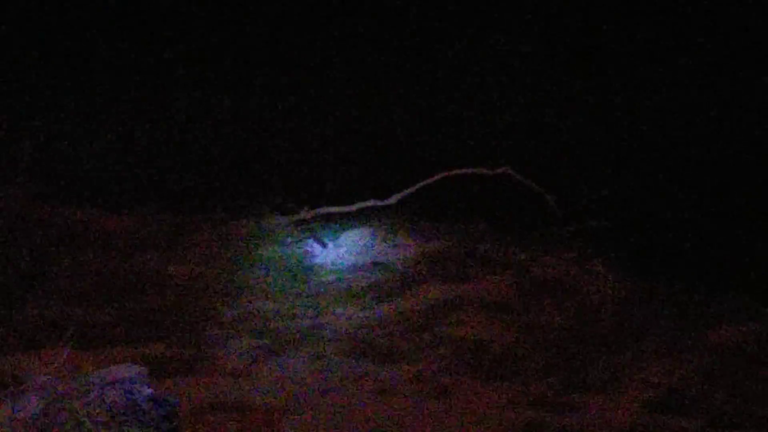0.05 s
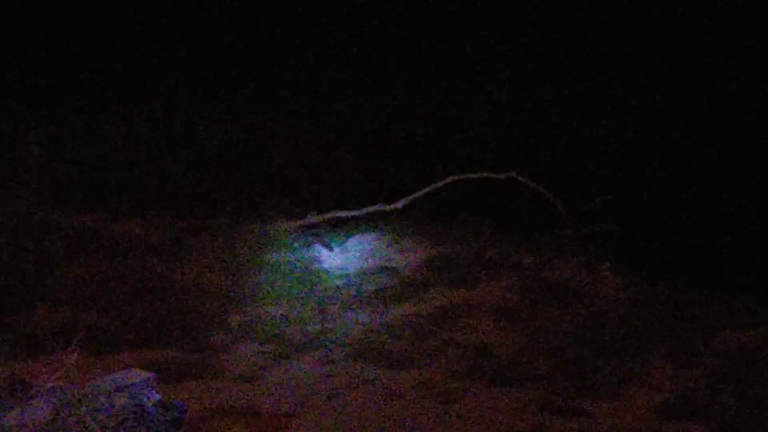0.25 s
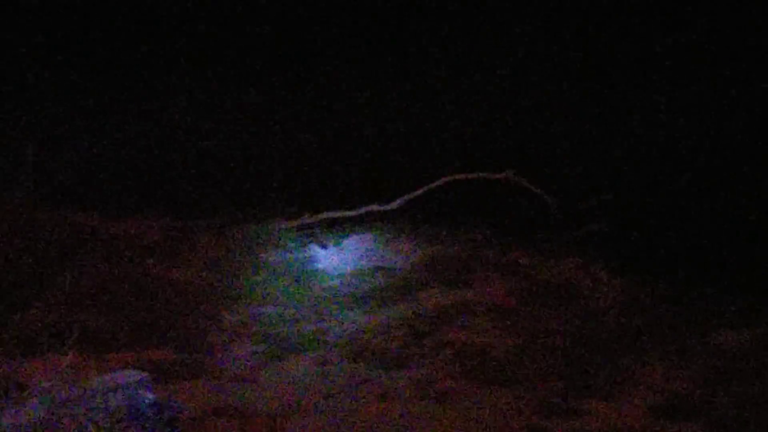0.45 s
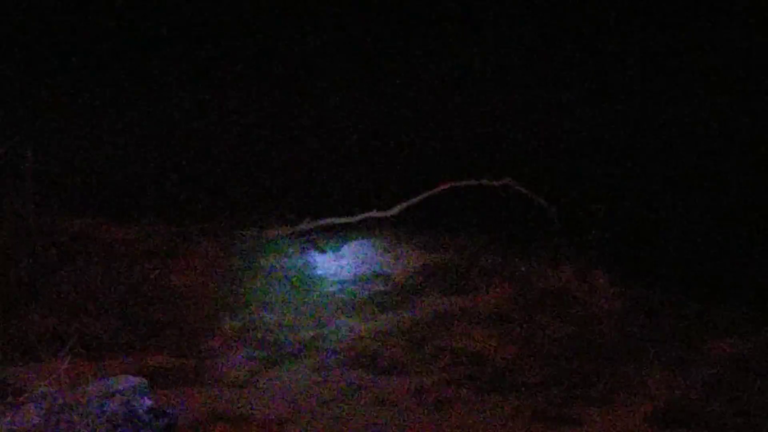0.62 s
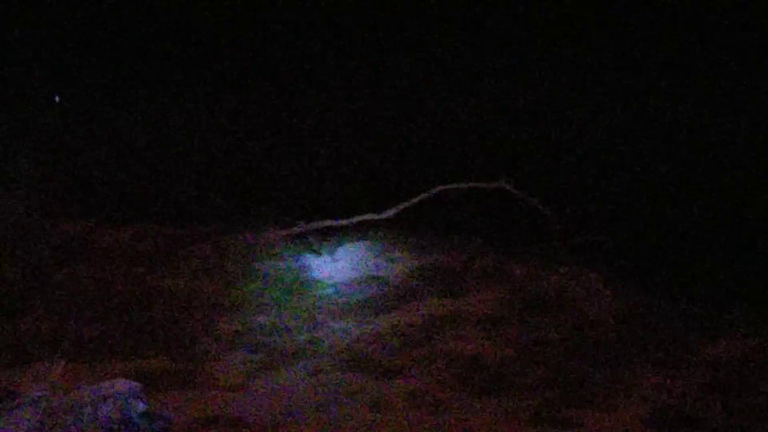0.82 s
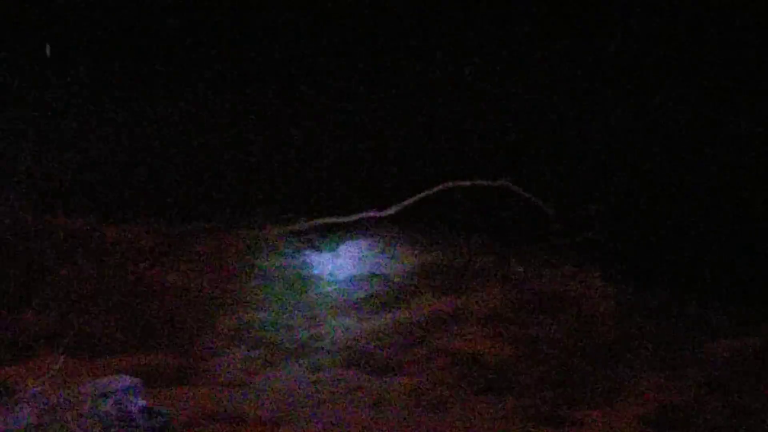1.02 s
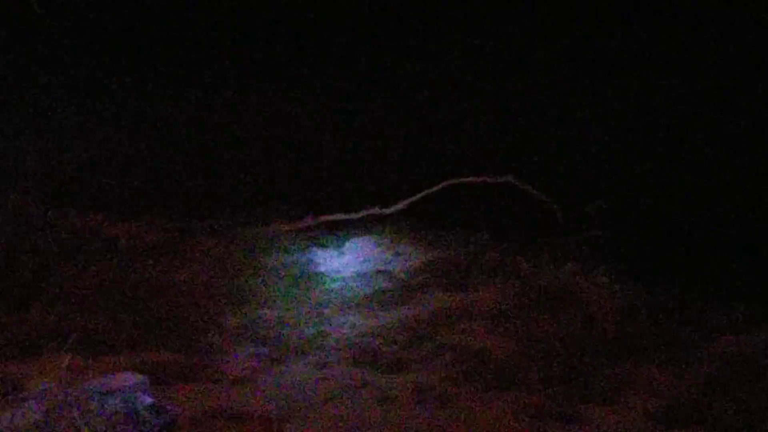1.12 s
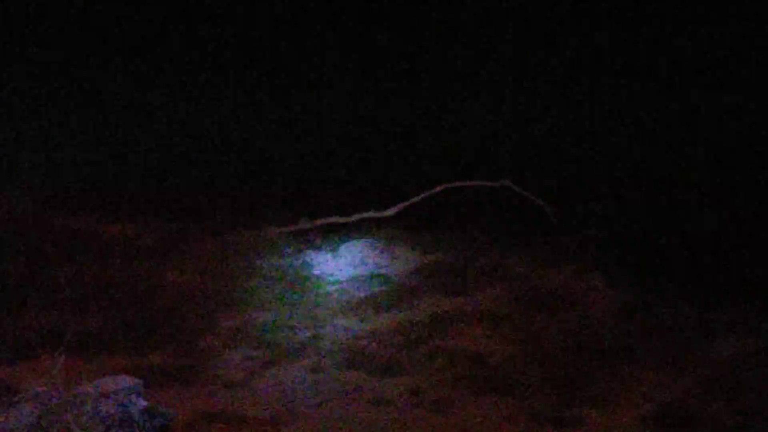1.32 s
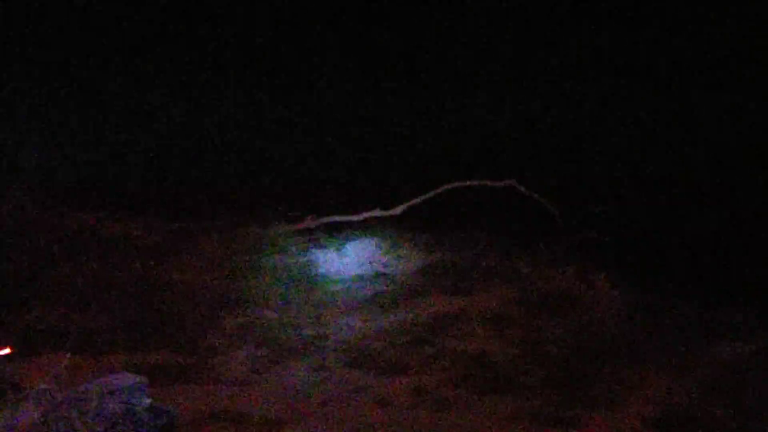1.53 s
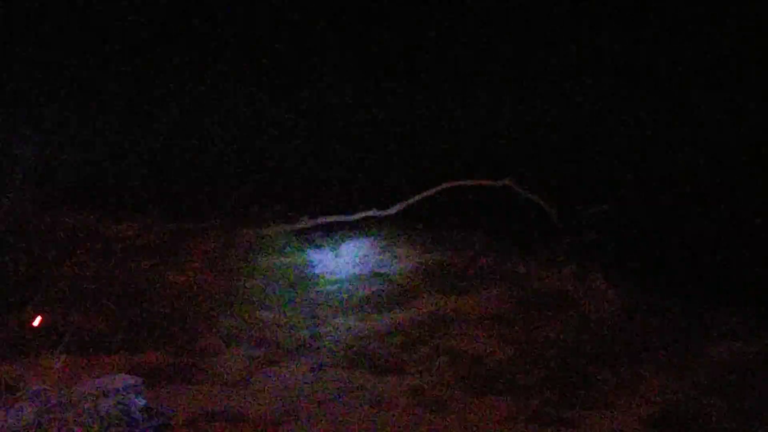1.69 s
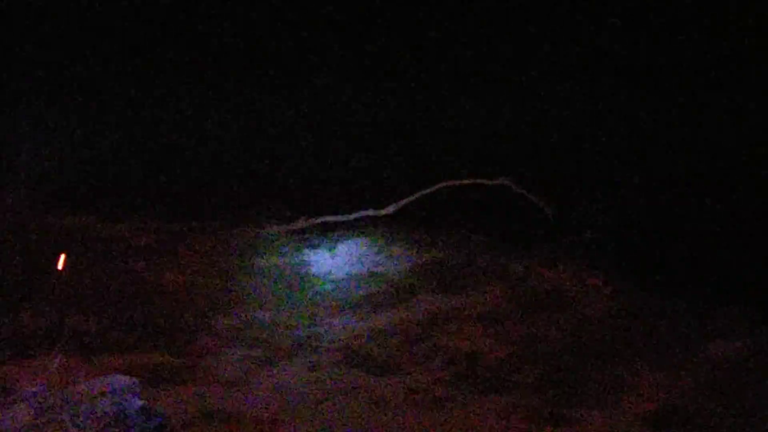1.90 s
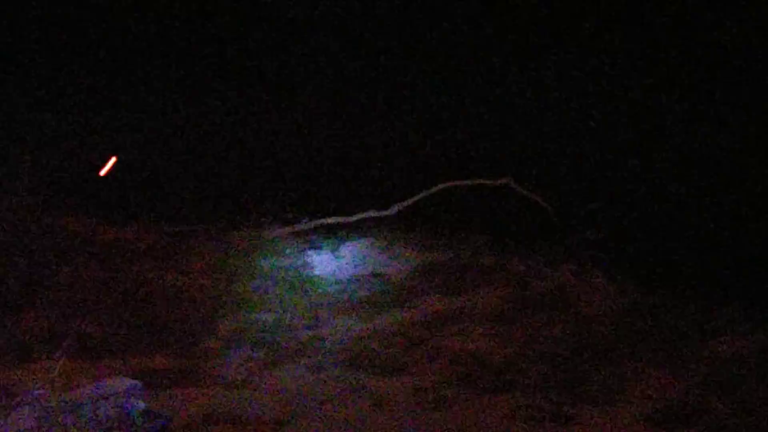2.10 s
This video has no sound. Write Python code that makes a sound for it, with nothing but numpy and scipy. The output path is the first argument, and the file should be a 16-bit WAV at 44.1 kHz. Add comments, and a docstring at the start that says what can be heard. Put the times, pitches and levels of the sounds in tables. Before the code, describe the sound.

Two loud, close cracks from a campfire over faint night chirps and low rumble.

```python
"""A small, close wood fire pops twice loudly and once softly on a riverbank at night.
Each pop is one pressure pulse with echoes off ground and stones, a thump and ring of the log,
and a brief wash back from the bank. Boiling sap hisses at first; embers squeak.
Crickets and a peeping frog call faintly over the drone of a distant engine."""
import sys
import numpy as np
from scipy import signal
from scipy.fft import rfft, irfft, next_fast_len
from scipy.io import wavfile
from scipy.ndimage import map_coordinates

SR = 44100
rng = np.random.default_rng(int(sys.argv[2]) if len(sys.argv) > 2 else 0)


def to_wav(sig):
    """Store sig (one row per channel, or 1-D mono) as 16-bit WAV at the path in sys.argv[1].

    Samples outside -1..1 are clipped; the rate is SR.
    """
    pcm = np.clip(np.atleast_2d(sig), -1, 1) * 32767
    pcm = np.round(pcm).astype(np.int16)
    wavfile.write(sys.argv[1], SR, pcm.T)  # frames by channels


N = 94815


def from_db(db):
    """Decibels to gain."""
    return 10 ** (np.asarray(db) / 20)


def seconds():
    """Time of every sample."""
    return np.arange(N) / SR


def unit(x):
    """Scale to unit energy."""
    return x / np.sqrt(np.sum(x ** 2) + 1e-30)


def colour(x, points):
    """Minimum-phase filter through (f/Hz, level/dB) points."""
    hz, db = np.transpose(points)
    grid_hz = np.maximum(np.fft.rfftfreq(2 * next_fast_len(N), 1 / SR), 1)
    cepstrum = irfft(np.log(from_db(np.interp(np.log(grid_hz), np.log(hz), db))))
    size = len(cepstrum)
    cepstrum[1:size // 2] *= 2
    cepstrum[size // 2 + 1:] = 0
    return irfft(rfft(x, size) * np.exp(rfft(cepstrum)))[:N]


def noise(points):
    """Coloured noise, unit rms."""
    return unit(colour(rng.standard_normal(N), points)) * np.sqrt(N)


def lowpass(x, hz):
    """First-order treble loss."""
    return signal.sosfilt(signal.butter(1, hz, fs=SR, output="sos"), x)


def bell(x, hz, db, q):
    """One resonance or dip."""
    g, w = from_db(db / 2), 2 * np.pi * hz / SR
    k = np.sin(w) / (2 * q)
    mid = -2 * np.cos(w)
    return signal.lfilter([1 + k * g, mid, 1 - k * g], [1 + k / g, mid, 1 - k / g], x)


def delay(x, s):
    """Delay by s seconds."""
    return np.concatenate([np.zeros(round(s * SR)), x])[:N]


def decay(t, t60_s):
    """Gain falling 60 dB in t60_s."""
    return np.exp(-np.log(1000) * t / t60_s)


def drift(rate_hz):
    """Smooth random curve, spread about one."""
    knots = rng.standard_normal(400)
    return map_coordinates(knots, [seconds() * rate_hz + 2], order=3, mode="wrap")


def note(centre_s, hz, db, width_s, rough, fall_hz_per_s=0, rough_hz=130):
    """Gaussian tone burst; rough (0-1) jitters amplitude and phase."""
    t = seconds() - centre_s
    near = np.abs(t) < 3 * width_s
    t, out = t[near], np.zeros(N)
    knots = rng.standard_normal((2, 256))
    real, imag = (map_coordinates(k, [t * rough_hz], order=3, mode="grid-wrap") for k in knots)
    grain = (1 + rough * (real + 1j * imag)) / np.sqrt(1 + 2 * rough ** 2)
    envelope = np.sqrt(2) * from_db(db) * np.exp(-2 * (t / width_s) ** 2)
    carrier = np.exp(2j * np.pi * (hz - fall_hz_per_s * t / 2) * t)
    out[near] = envelope * np.imag(grain * carrier)
    return out


def night_air():
    """Slowly heaving low rumble and steady faint hiss."""
    # noise spectra: f/Hz, relative level/dB
    rumble_spectrum = [(20, -24), (35, -11), (55, 2), (85, 8.5), (130, 4), (200, -8.5), (280, -24.5),
                       (340, -34), (600, -48), (2000, -70.5)]
    hiss_spectrum = [(100, 10), (500, 2.5), (1000, -2), (2100, -4), (2600, -0.5), (3100, -5), (4400, -6),
                     (5500, -8), (10000, -9.5), (15500, -10)]
    rumble = from_db(-51.5 + 0.5 * drift(11)) * noise(rumble_spectrum)
    return rumble + from_db(-73.5) * noise(hiss_spectrum)


def engine():
    """Far engine: low tones, most wavering in amplitude and phase."""
    # drone tones: f/Hz, level/dB, waver/0-1
    tones = [(80.3, -62, 0.9), (95.6, -49.5, 0.3), (113.4, -55.5, 0), (260.7, -79.5, .6)]
    t, out = seconds(), 0
    for hz, db, waver in tones:
        swing = 1 + waver * (drift(7) + 1j * drift(21))
        tone = np.real(swing * np.exp(2j * np.pi * hz * t))
        out += from_db(db) * np.sqrt(N) * unit(tone)
    return out


def bumps():
    """Soft low bumps."""
    # t/s, f/Hz, level/dB, width/s
    bursts = [(0.14, 204, -54.5, 0.02), (0.185, 265, -60.5, 0.022), (0.272, 479.7, -55.5, 0.0095),
              (0.655, 248, -57.5, 0.0075), (0.865, 135, -42.5, 0.011), (0.868, 205.3, -54.5, 0.0092),
              (0.945, 185, -53.5, 0.022), (1.515, 262, -67.5, .015), (1.795, 270.8, -63, 0.011)]
    return sum(note(*row, rough=.2) for row in bursts)


def crickets():
    """Chirps of three falling syllables over a steady high trill."""
    # t/s, f/Hz, level/dB, fall/(Hz/s), fade per syllable/dB
    chirps = [(0.205, 4600, -80, 8000, 4), (0.53, 4613, -77.5, 1000, 0.5), (0.869, 4226, -74, 9230, -1),
              (1.128, 4645, -77, 1003, 1), (1.449, 4304, -75, 6920, -0.5), (1.598, 4610, -76, 980, 0.5),
              (2.013, 4250, -74, 8080, 3.5), (2.077, 4600, -75.5, 988, -0.5)]
    period_s, rough = .052, .6
    out = 0
    for s, hz, db, fall, fade_db in chirps:
        for k, (sharp, loud) in enumerate(rng.standard_normal((3, 2))):
            level_db = db - k * fade_db + 1.5 * loud
            out += note(s + k * period_s, hz + 13 * sharp, level_db,
                        width_s=.021, rough=rough, fall_hz_per_s=fall)
    for k, (late, loud) in enumerate(rng.standard_normal((42, 2))):  # trill
        out += note(k * period_s + .0038 * late, hz=6426, db=-88 + 1.9 * loud, width_s=.013, rough=rough)
    return out


def frog():
    """Short peeps on one pitch."""
    # t/s, level/dB, width/s
    peeps = [(0.593, -66.5, 0.021), (0.641, -87.5, .03), (0.707, -73.5, 0.0083), (0.775, -69.5, 0.03),
             (0.801, -75, 0.01), (0.829, -72, .012)]
    return sum(note(s, hz=2572, db=db, width_s=width_s, rough=.31) for s, db, width_s in peeps)


def distant(calls, echo_db=-6.5):
    """Distance blurs calls with a diffuse tail."""
    tail = unit(rng.standard_normal(N) * decay(seconds(), t60_s=.72))
    return calls + from_db(echo_db) * signal.fftconvolve(calls, tail)[:N]


def embers():
    """Small rough ticks and squeaks."""
    # t/s, f/Hz, level/dB, width/s
    squeaks = [(0.527, 3700, -81.5, .012), (0.612, 3600, -79, 0.0088), (0.685, 4050, -79, 0.0066),
               (0.836, 13160, -69.5, .004), (1.103, 1806, -70, 0.024), (1.367, 3470, -78, .035),
               (1.368, 1900, -78.5, .014), (1.635, 560, -76.5, 0.011), (1.765, 2180, -69, .006)]
    return sum(note(*row, rough=1) for row in squeaks)


def sap():
    """Boiling sap: thin flickering hiss with faint whistles that come and go."""
    # hiss spectrum: f/Hz, relative level/dB
    spectrum = [(300, -43), (9000, -28.5), (11500, -9), (13000, -1), (14200, 0), (16000, -7.5)]
    # f/Hz, level re hiss/dB
    whistles = [(12080, -14.5), (12620, -11.5), (13130, -9), (14000, -12.5), (15150, -13)]
    # hiss envelope: t/s, level/dB
    envelope = [(0, -69.5), (.1, -75), (.2, -76), (.37, -71.5), (.48, -79.5), (.63, -79.5), (.7, -95),
                (2.15, -100)]
    waver_hz, whistle_flicker_db, flicker_db = 200, 8.5, 2.5
    t, hiss = seconds(), noise(spectrum)
    for hz, db in whistles:
        waver = drift(waver_hz) + 1j * drift(waver_hz)
        whistle = np.real(waver * np.exp(2j * np.pi * hz * t))
        hiss += from_db(db + whistle_flicker_db * drift(9.1)) * whistle
    return hiss * from_db(np.interp(t, *np.transpose(envelope)) + flicker_db * drift(45))


def bank_wash(hold_s, presence_db, treble_db):
    """Diffuse return from the bank: sags, bass first, then dies after hold_s. Unit energy."""
    # f/Hz, relative level/dB
    spectrum = [(150, -2), (350, 0), (520, 8), (750, 3.5), (1000, 5), (1500, -2.5), (2100, -6), (2550, 2.5),
                (3000, -4), (4000, -10), (6000, -10.5), (9000, -13), (13000, -13.5), (16000, -15.5)]
    rise_s, sag_db_per_s, bass_sag_db_per_s = .003, 36.5, 103.5
    far_echo_db, far_echo_width_s = 1, .058
    t = seconds()
    envelope = (1 - np.exp(-t / rise_s)) * from_db(-sag_db_per_s * t)
    envelope *= decay(np.maximum(t - hold_s, 0), t60_s=.27)
    envelope *= from_db(far_echo_db * np.exp(-((t - hold_s) / far_echo_width_s) ** 2))
    wash = colour(noise(spectrum), [(1200, 0), (3500, presence_db), (12000, treble_db)])
    wash -= lowpass(wash, hz=1200) * (1 - from_db(-bass_sag_db_per_s * t))
    return unit(wash * envelope)


def log_body(ring_db, thump_db, thump_hz=190):
    """The burning log rings in damped modes over a low thump."""
    # wood modes: f/Hz, relative level/dB, t60/s
    modes = [(589, -4.5, 0.11), (1580, -2, .2), (1700, 2, 0.15), (2190, -4.5, .14), (2700, -10, .3),
             (3370, -8.5, .13)]
    t = seconds()
    ring = sum(from_db(db) * np.sin(2 * np.pi * hz * t) * decay(t, t60_s) for hz, db, t60_s in modes)
    thump = np.sin(2 * np.pi * thump_hz * t) * decay(t, t60_s=.065)
    return from_db(ring_db) * unit(ring) + from_db(thump_db) * unit(thump)


def crack(spectrum, ground_ms, stone_ms, ground_db, stone_db, scatter_db=-10):
    """One pressure pulse, two duller echoes and scatter off nearby stones."""
    pulse = unit(colour(signal.unit_impulse(N), spectrum))
    dull = lowpass(pulse, hz=14000)
    ground = from_db(ground_db) * delay(dull, ground_ms / 1000)
    stone = from_db(stone_db) * delay(dull, stone_ms / 1000)
    burst = rng.standard_normal(N) * decay(seconds(), t60_s=.029)
    scatter = unit(lowpass(colour(burst, spectrum), hz=8100))
    return pulse + ground + stone + from_db(scatter_db) * delay(scatter, ground_ms / 1000)


def wood_pops():
    """Each pop: crack and wash through the microphone's colour, plus the log's ring and thump."""
    # t/s, gain/dB, ground echo/dB, stone echo/dB, wash/dB, wash hold/s,
    # wash presence/dB, wash treble/dB, ring/dB, thump/dB
    pops = [(0.226, 5.5, -6.5, -17.5, -23.5, .17, -1, -6.5, -32, -22),
            (0.9536, -33, 1, -13, -4, 0.043, 8.5, -13, -1, -21),
            (1.8609, -3, -6, -14, -16.5, 0.11, -1.5, -9.5, -28, -13)]
    # pulse spectrum per pop: f/Hz, relative level/dB
    spectra = [
        [(100, -15.5), (300, -14), (600, -7.5), (1100, -8.5), (1700, -4.5), (3200, -1.5), (4400, -2),
         (5300, -8.5), (6900, -15.5), (8000, -11.5), (9200, -23.5), (11200, -17), (13000, -5.5), (15000, -21)],
        [(100, -12.5), (550, 2.5), (1050, -31), (1650, 6), (2250, -9), (2700, -5), (4300, -10.5), (6000, -18.5),
         (8500, -27.5), (15000, -29)],
        [(100, -19.5), (300, -17.5), (600, 4.5), (1100, 0), (1700, -3.5), (2800, 0), (4000, -4.5), (4900, -18),
         (6000, -13.5), (8000, -15.5), (9500, -23.5), (15000, -27)],
    ]
    # echo delays per pop: ground/ms, stone/ms
    echo_delays = [(1.92, 4.42), (1.88, 4.05), (2.07, 4.1)]
    # microphone peak near 590 Hz between two dips: f/Hz, gain/dB, Q
    mic_colour = [(380, -13, 1.3), (588, 8.5, 2.8), (830, -6.5, 1.8)]
    out = 0
    for row, spectrum, delays_ms in zip(pops, spectra, echo_delays):
        s, db, ground_db, stone_db, wash_db, hold_s, presence_db, treble_db, ring_db, thump_db = row
        pop = crack(spectrum, *delays_ms, ground_db, stone_db)
        pop += from_db(wash_db) * bank_wash(hold_s, presence_db, treble_db)
        for band in mic_colour:
            pop = bell(pop, *band)
        pop += log_body(ring_db, thump_db)
        out += from_db(db) * delay(pop, s)
    return out


def scene():
    """Mono sum of background, fire and animals."""
    background = bumps() + engine() + night_air()
    fire = wood_pops() + sap() + embers()
    return (background + fire + distant(frog() + crickets()))[None]


def record(dry):
    """Soft peak limit, then steep low-pass."""
    limit, cutoff_hz = .96, 15900
    rounded = limit * np.tanh(dry / limit)
    return signal.sosfilt(signal.ellip(10, .1, 70, cutoff_hz, fs=SR, output="sos"), rounded)


dry = scene()
out = record(dry)
to_wav(out)
```